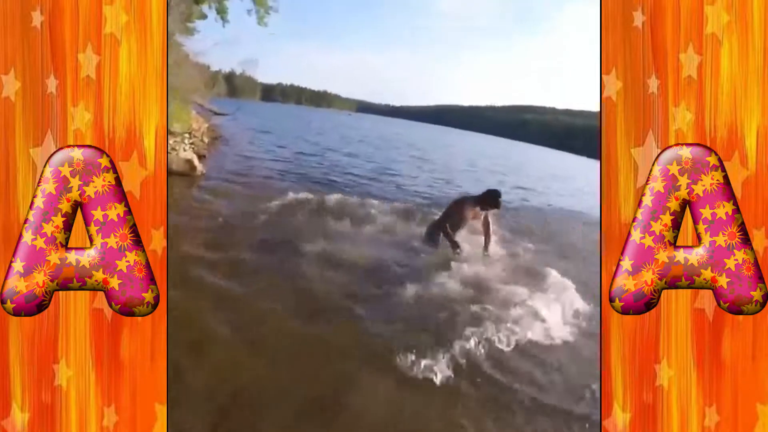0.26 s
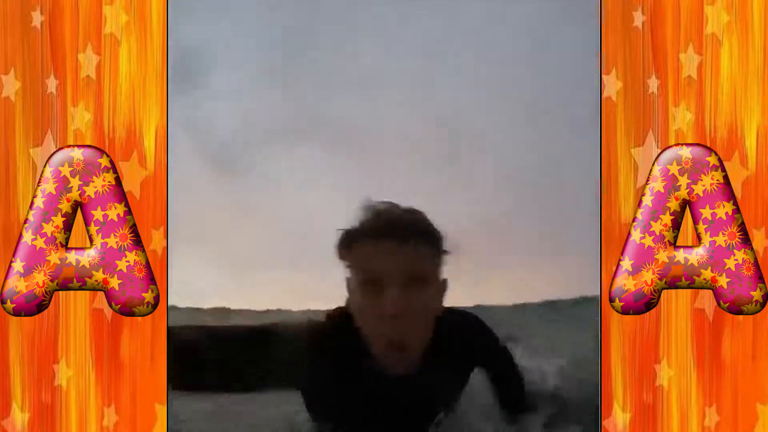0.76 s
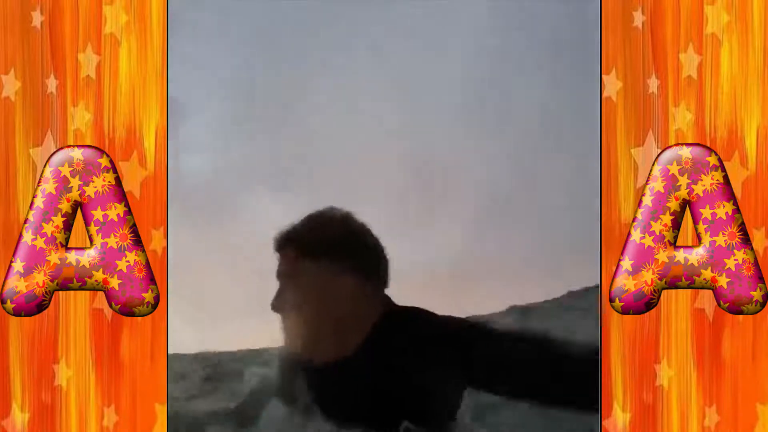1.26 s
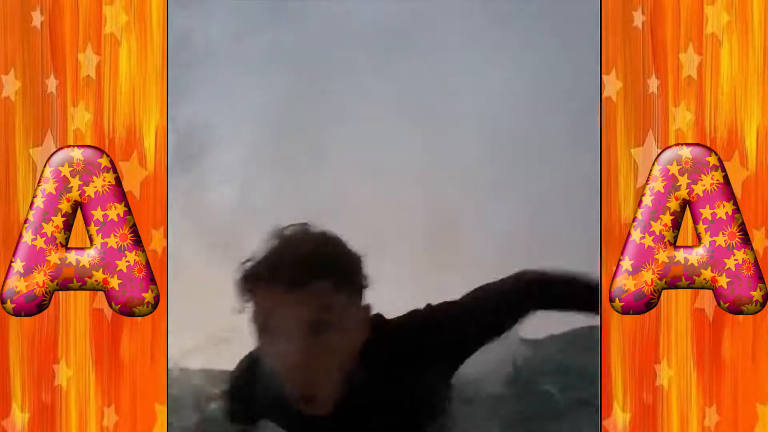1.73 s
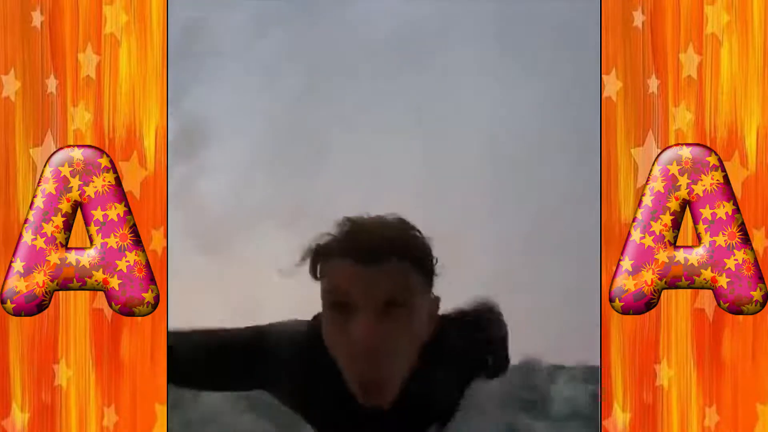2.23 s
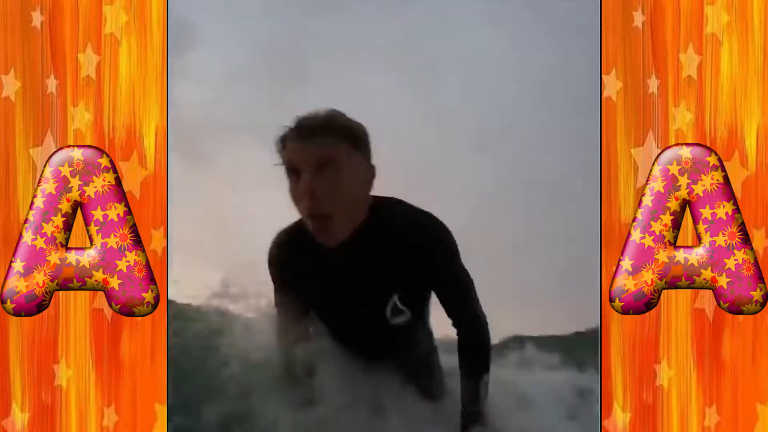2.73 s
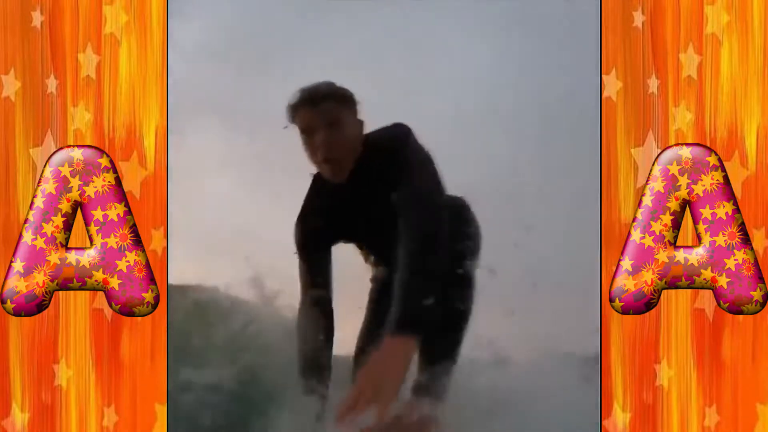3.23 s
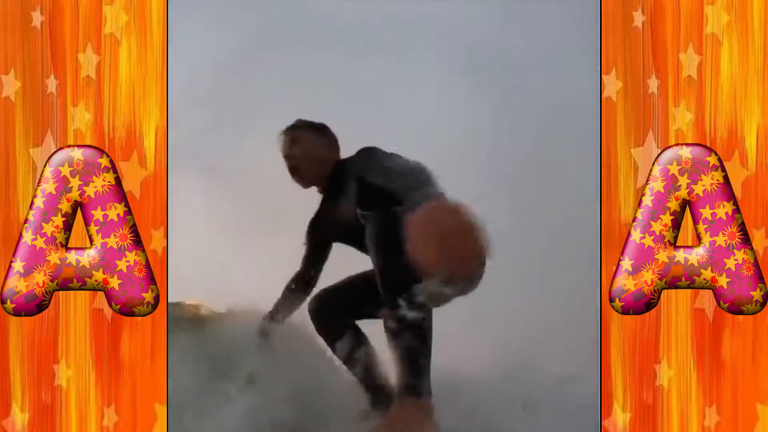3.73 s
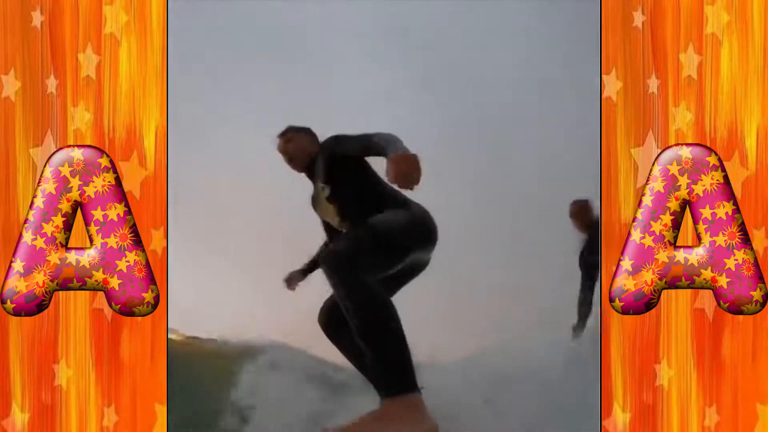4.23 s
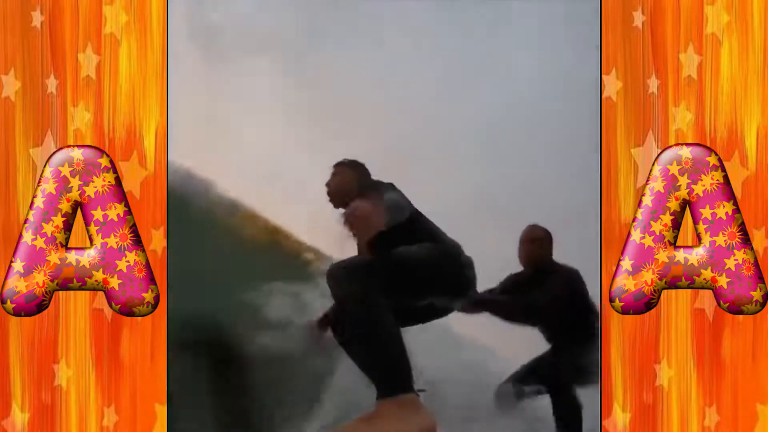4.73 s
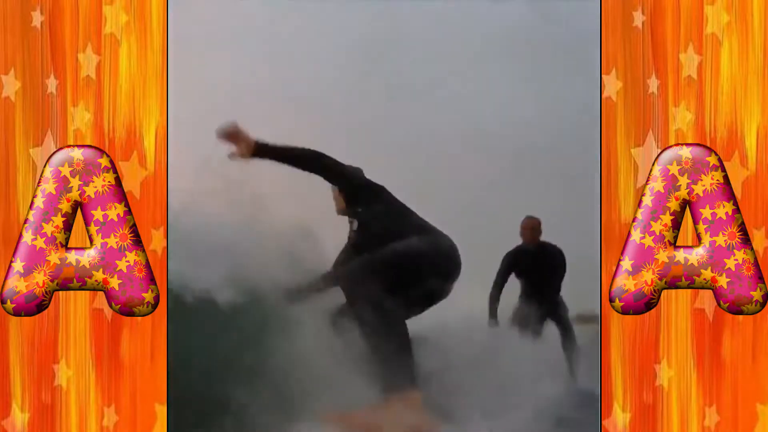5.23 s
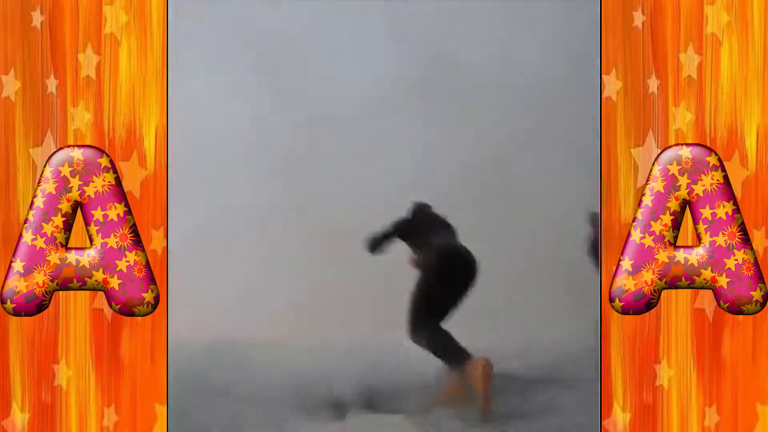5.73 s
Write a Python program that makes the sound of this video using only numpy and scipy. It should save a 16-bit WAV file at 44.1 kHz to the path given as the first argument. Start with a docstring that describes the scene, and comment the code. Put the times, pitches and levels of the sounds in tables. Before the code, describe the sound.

From 0 to about 0.45 s, a person splashes in a lake: thin bright spray hiss, light churning, low wind puffs and three soft hollow plops at 0.1, 0.2 and 0.27 s. It falls nearly silent until 0.55 s, when a surfboard's sealed camera housing takes over, close and muffled. Until 2.5 s, water rushes over it in uneven gusts, with gurgles, a hard knocking cluster near 0.9 s, sharp ticks around 1.3 s and a strong wash at 1.7 s, over low board ringing. At 2.62 s a very loud click and thump land; then deep, irregular rumbling surges and dull slaps dominate, with water thin and nearly gone around 3.4 s. Another sharp tick comes at 3.09 s. From 4 to 5 s low board hum throbs under faint streaming. After 5 s splashy washes and gurgles return, rumble continues, and bright drops click near 5.83-5.92 s before the end.

```python
"""By a lake under a light wind there is a short splash; after a brief near-silence, the scene moves to a surfboard.
The lake is filtered noise with wind puffs, splashing, spray hiss and a few hollow plops.
On the board, water and wind shake a sealed housing: noise swings as a deep surge and rings board and mount.
Streaming water is noise with droplets, coloured by the housing's resonances; trapped air gurgles in it.
Short single sounds are the board's slaps, knocks of thrown water and bright ticks of drops."""
import sys
import numpy as np
from scipy import signal
from scipy.fft import rfft, irfft
from scipy.io import wavfile
from scipy.ndimage import uniform_filter1d

SR = 44100
rng = np.random.default_rng(int(sys.argv[2]) if len(sys.argv) > 2 else 0)


def generate_wav(sig):
    """Save sig (samples, or channels by samples) to the path in sys.argv[1] as 16-bit PCM at SR."""
    pcm = np.round(np.clip(np.atleast_2d(sig).T, -1, 1) * 32767).astype(np.int16)
    wavfile.write(sys.argv[1], SR, pcm)


N = 262836   # length in samples, about 6 s


def amp(db):
    """Turn decibels into a gain."""
    return 10 ** (np.asarray(db) / 20)


def unit(x):
    """Scale to an rms (average strength) of 1."""
    return x / np.sqrt(np.mean(x ** 2) + 1e-20)


def levels(rows):
    """Draw one gain curve per level column of a table, practically silent before its first row."""
    s, *columns = np.transpose(rows)
    t = np.arange(N) / SR
    return [amp(np.interp(t, s, column, left=-150)) for column in columns]


def flutter(rate_hz):
    """Slow random wavering with rms 1: noise smoothed twice by the same low-pass."""
    r = np.exp(-2 * np.pi * rate_hz / SR)
    noise = rng.standard_normal(N + SR)
    smooth = signal.lfilter([1], [1, -2 * r, r * r], noise)
    return unit(smooth[SR:])   # the first second lets the filter settle


def resonate(x, hz, width_hz):
    """One resonance, like a struck wall; its gain is about 1 at the peak."""
    r = np.exp(-np.pi * width_hz / SR)
    feed = (1 - r * r) / 2 * np.array([1, 0, -1])
    return signal.lfilter(feed, [1, -2 * r * np.cos(2 * np.pi * hz / SR), r * r], x)


def band(x, low_hz, high_hz, order):
    """Keep only the sound between two frequencies."""
    return signal.sosfilt(signal.butter(order, [low_hz, high_hz], "band", fs=SR, output="sos"), x)


def body(x, modes, patchy_db, per_s=0, rap_db=0, count=1):
    """A body rings in several modes; each one's drive wavers on its own, and stray droplets rap single modes."""
    out = 0
    for k, (hz, width_hz, level_db) in enumerate(modes):
        strengths = amp(rap_db + 1.6 * rng.standard_normal(N))
        raps = strengths * (rng.random(N) < per_s / SR)
        # a soft contact excites little beside its mode
        ring = x + 3 * resonate(raps + 1e-18, hz, 2 * width_hz)
        ring = ring * amp(level_db + patchy_db * flutter(37))
        for _ in range(count):
            ring = resonate(ring, hz, width_hz)
        out = out + (-1) ** k * ring   # neighbours have opposite sign
    return out


def add(out, s, peak_db, sound):
    """Place a sound at a time in seconds with a given peak."""
    i = round(s * SR)
    scaled = amp(peak_db) * sound / np.abs(sound).max()
    out[i:i + len(sound)] += scaled[:N - i]


def churn(per_s, spread_db, share):
    """Turbulent water: noise mixed with uneven droplet impacts, which hold a share of the power."""
    extra_db = spread_db * np.minimum(rng.exponential(1, N), 5)
    sizes = amp(extra_db) * rng.choice([-1, 1], N)
    drops = unit(sizes * (rng.random(N) < per_s / SR))
    share = np.clip(share, 0, 1)
    return np.sqrt(share) * drops + np.sqrt(1 - share) * rng.standard_normal(N)


def steady(x, span_s, firmness):
    """Noise swells and fades by chance; a forced motion swings more evenly, so partly level it out."""
    size = round(span_s * SR)
    power = uniform_filter1d(unit(x) ** 2, size=size)
    power = uniform_filter1d(power, size=size)
    return unit(x / (power + 0.067) ** (firmness / 2))


def gusts(steady_rows, events, rises, falls):
    """Gain per layer: events climb, hold and die away at rates in dB per s; powers add to the steady level."""
    t, out = np.arange(0, N + 32, 32) / SR, []   # a coarse clock, one step per 32 samples
    s, hold, *peaks_db = np.transpose(events)[:, :, None]
    started = np.arange(N) >= steady_rows[0][0] * SR
    for base, peak_db, rise, fall in zip(levels(steady_rows), peaks_db, rises, falls):
        below_db = rise * np.maximum(s - t, 0) + fall * np.maximum(t - s - np.abs(hold), 0)
        power = np.sum(amp(peak_db - below_db) ** 2, axis=0)
        power = np.interp(np.arange(N) / SR, t, power)
        out.append(np.sqrt(base ** 2 + power) * started)
    return out


# The lake over time. Each row: time in seconds, wind on the microphone in dB, splashing in dB, spray hiss in dB.
LAKE_LEVELS = [(0.0, -12, -36.5, -29.5), (0.126, -41, -38, -32.5), (0.284, -48, -37, -33.5),
               (0.296, -49, -38.5, -30), (0.318, -25, -38.5, -31.5), (0.412, -33, -37.5, -33.5),
               (0.432, -23.5, -55, -48), (0.466, -32, -48.5, -43), (0.478, -56, -64.5, -73),
               (0.548, -66, -58.5, -80)]
# Tone colour of the splashing water. Each row: frequency in Hz, relative strength in dB per Hz.
SPLASH_COLOUR = [(88, -53), (150, -14), (245, -13), (302, -9.5), (354, -14.5), (610, -7), (822, -17),
                 (962, -13), (1130, -15.5), (3910, -21), (5270, -14.5), (6070, -18.5), (9080, -8.5),
                 (9910, 11), (12900, -83)]
# Hollow plops. Each row: start in seconds, peak in dB, ring in Hz, time to fade by 60 dB in seconds.
LAKE_PLOPS = [(0.095, -30, 317, 0.053), (0.19, -19.5, 324, 0.1), (0.268, -15.5, 298, 0.094)]


def lake():
    """Wind puffs, splashing, spray hiss with the microphone's peak near 5 kHz, and cavities that plop."""
    wind, splashing, spray = levels(LAKE_LEVELS)
    hz = np.arange(N // 2 + 1) * SR / N + 1   # 1 Hz up, so the logarithm exists
    colour_hz, colour_db = np.transpose(SPLASH_COLOUR)
    colour = amp(np.interp(np.log(hz), np.log(colour_hz), colour_db))
    water = irfft(rfft(churn(1500, 2.4, share=0.2)) * colour, N)
    low = band(water, 91, 2660, order=4)
    high = band(water, 2740, 14000, order=4)
    high = high + 6.4 * resonate(high, 5370, 330) + 2.6 * resonate(high, 6470, 270)
    puffs = band(rng.standard_normal(N), 13.6, 35.5, order=2)
    out = wind * steady(puffs, 0.026, firmness=0.18)
    out += splashing * unit(low) + spray * unit(high)
    out *= np.arange(N) < LAKE_LEVELS[-1][0] * SR   # the lake ends with its last row
    t = np.arange(SR // 10) / SR
    for s, peak_db, ring_hz, t60 in LAKE_PLOPS:
        # the surface closes with a dull push, the cavity rings on
        push = -1.6 * np.exp(-(t / 0.0022 - 1) ** 2)
        ring = np.sin(2 * np.pi * ring_hz * t) * amp(-60 * t / t60)
        add(out, s, peak_db, push + ring)
    return out


# Resonances of the board. Each row: frequency in Hz, width in Hz, relative strength in dB.
BOARD_MODES = [(64.2, 19, -3), (81.7, 20.6, 1.5), (106.6, 19, -14.5)]
# Resonances of the mount. Each row: frequency in Hz, width in Hz, relative strength in dB.
MOUNT_MODES = [(168, 130, -5), (220, 40, 1), (269.3, 15.1, 4.5)]
# Steady motion of the board under the jolts.
# Each row: time in seconds, surge in dB before its 0.62 trim, board ring in dB, mount ring in dB.
GLIDE_LEVELS = [(0.55, -36, -38, -43), (0.7, -24, -30, -40.5), (1.0, -27, -30, -36.5), (1.6, -20, -30, -46),
                (2.0, -26.5, -25, -39), (2.25, -28, -30.5, -52), (2.45, -11, -28, -46),
                (2.68, -15, -35.5, -53), (3.4, -19, -31, -55), (3.47, -18.5, -47, -56),
                (3.6, -27, -31, -63.5), (4.15, -23, -25.5, -46), (4.45, -25, -15.5, -35.5),
                (4.85, -16.5, -26, -39.5), (5.3, -19.5, -21, -34), (5.96, -17.5, -36, -37.5)]
# Chop jolts the board.
# Each row: start of the hold in seconds, hold in seconds, surge in dB before its 0.62 trim,
# board ring in dB, mount ring in dB.
CHOP_JOLTS = [(0.552, 0.038, -38, -43, -35), (0.74, 0.089, -38, -38, -33.5),
              (0.813, 0.067, -20, -13, -30.5), (1.146, 0.013, -30, -44, -32.5),
              (1.237, 0.07, -40, -22.5, -27.5), (1.402, 0.017, -36, -19.5, -58),
              (1.475, 0.018, -29, -19, -34.5), (1.565, 0.023, -26, -43, -30),
              (1.686, 0.021, -13.5, -17, -20.5), (1.745, 0.088, -41, -11, -31.5),
              (1.98, 0.016, -33, -39, -36), (2.097, 0.069, -33, -25, -36), (2.271, 0.01, -18.5, -49, -36),
              (2.342, 0.029, -13.5, -19.5, -37), (2.384, 0.15, -25, -26.5, -26.5),
              (2.525, 0.015, -12, -13, -32), (2.617, 0.0038, -18, -29, -25.5),
              (2.737, 0.044, -13.5, -30, -48), (2.802, 0.02, -4.5, -36, -31.5),
              (2.92, 0.012, -22, -40, -36.5), (2.955, 0.0063, -13.5, -34, -42),
              (3.036, 0.018, -18, -37, -36), (3.086, 0.022, -8, -18, -30.5),
              (3.197, 0.019, -34, -19.5, -47), (3.345, 0.008, -18, -28, -53),
              (3.521, 0.0051, -13, -13.5, -45), (3.587, 0.043, -12, -19, -39.5),
              (3.66, 0.068, -19, -17, -36), (3.731, 0.018, -8, -31, -42), (3.805, 0.08, -13, -19, -35),
              (3.873, 0.075, -17.5, -16, -37), (4.015, 0.013, -19.5, -21, -33.5),
              (4.219, 0.082, -40, -17, -34.5), (4.336, 0.077, -12.5, -18, -37),
              (4.55, 0.12, -44, -19.5, -47), (4.752, 0.031, -25, -36, -34.5), (4.906, 0.014, -15, -31, -48),
              (4.967, 0.0046, -8.5, -17, -28), (5.112, 0.007, -29.5, -18.5, -26.5),
              (5.201, 0.015, -8, -36, -44), (5.31, 0.12, -19, -27, -35.5), (5.463, 0.04, -26, -16.5, -25),
              (5.515, 0.015, -20, -14.5, -37.5), (5.564, 0.014, -7, -34, -44),
              (5.675, 0.052, -11, -16.5, -31), (5.739, 0.023, -8.5, -34, -45),
              (5.817, 0.0075, -20, -10, -19), (5.892, 0.031, -21, -15, -34)]
BOARD_WANDER, WANDER_HZ = .09, 5.006   # the water's load shifts the board's pitch: rms share, speed


def rumble():
    """Water and wind push the board about and set board and mount ringing."""
    surge, board, mount = gusts(GLIDE_LEVELS, CHOP_JOLTS,
                                rises=(356.5, 399.5, 415.5), falls=(553.5, 257, 419))
    deep = steady(band(rng.standard_normal(N), 23.0, 43.3, order=2), 0.039, firmness=0.29)
    ring = body(rng.standard_normal(N), BOARD_MODES, patchy_db=0.5)
    ring = band(ring, 45.2, 103.0, order=3)
    # reading the ring faster or slower bends its pitch; the drift is removed so that both ends stay put
    wander = np.cumsum(BOARD_WANDER * flutter(WANDER_HZ))
    position = np.arange(N) + wander - np.linspace(0, wander[-1], N)
    ring = steady(np.interp(position, np.arange(N), ring), 0.032, firmness=0.69)
    buzz = body(churn(300, 0.52, share=0.44), MOUNT_MODES, patchy_db=0.0)
    buzz = steady(band(buzz, 59, 490, order=2), 0.028, firmness=0.038)
    return 0.62 * surge * deep + board * ring + mount * buzz


# The board slaps down. Each row: start in seconds, peak in dB, swing in Hz, relative mount thud in dB.
BOARD_SLAPS = [(0.551, -19.5, 188, -24), (2.617, -10, 45, 8.5), (2.799, -8.5, 40.2, -16),
               (3.084, -8.5, 57, -10), (3.101, -14.5, 70.4, 0), (3.322, -8, 44.7, -2.5),
               (3.861, -7, 93, -9), (4.406, -11, 73.6, -6), (5.67, -14, 39.8, 14.5)]


def slaps():
    """The board gives one dull swing and back, and the mount a short thud."""
    out, t = np.zeros(N), np.arange(SR // 10) / SR
    for s, peak_db, hz, thud_db in BOARD_SLAPS:
        swing = -np.sin(2 * np.pi * hz * t) * (t * hz) * np.exp(-2.5 * t * hz)
        thud = np.sin(2 * np.pi * 185 * t) * (t / 0.016) * np.exp(-t / 0.0057)
        add(out, s, peak_db, swing / np.abs(swing).max() + amp(thud_db) * thud)
    return out


# Broad walls of the housing. Each row: frequency in Hz, width in Hz, relative strength in dB.
WALL_MODES = [(303, 140, -5.5), (512.5, 117, -0.5), (843, 175, -1)]
# The housing's own ringing. Each row: frequency in Hz, width in Hz, relative strength in dB.
HOUSING_MODES = [(1196, 352, -2), (1903, 394, -1), (2316, 365, -4.5), (2753, 1010, -15.5)]
# The microphone port. Each row: frequency in Hz, width in Hz, relative strength in dB.
PORT_MODES = [(3536, 460, 4), (3720, 1500, -4), (5600, 630, -16.5), (6010, 780, -16.5), (7850, 690, -27)]
# Water streaming past between the washes. Each row: time in seconds, rush in dB, wallow in dB, spray in dB.
STREAM_LEVELS = [(0.55, -43, -47.5, -50.5), (0.75, -38, -47, -48), (1.0, -42.5, -45.5, -50),
                 (1.4, -36, -41.5, -50), (1.9, -38.5, -43, -51.5), (2.3, -39.5, -42.5, -50.5),
                 (2.625, -38, -48, -40.5), (2.635, -47, -49, -57.5), (3.0, -48.5, -51.5, -57.5),
                 (3.3, -52, -54.5, -62), (3.39, -61, -68, -70.5), (3.47, -49, -56, -59.5),
                 (3.53, -42.5, -43.5, -53.5), (3.9, -45, -47.5, -54), (4.47, -43, -43, -53.5),
                 (4.9, -43.5, -42.5, -51.5), (5.2, -37.5, -44, -46), (5.64, -44, -42, -51),
                 (5.96, -38.5, -37, -50.5)]
# Water washes over the housing.
# Each row: start of the hold in seconds, hold in seconds, rush in dB, wallow in dB, spray in dB.
WATER_WASHES = [(0.55, .01, -45, -53, -48), (0.709, 0.04, -35.5, -58, -47),
                (0.804, 0.038, -29.5, -27.5, -41.5), (0.849, 0.081, -27.5, -34.5, -38),
                (0.965, 0.0061, -38, -38, -46), (1.102, 0.011, -35, -69, -36),
                (1.147, 0.005, -26.5, -37, -40.5), (1.203, 0.012, -37.5, -54, -63),
                (1.3, 0.024, -28.5, -40, -38), (1.362, 0.011, -37, -48, -42), (1.444, 0.012, -34, -41, -43),
                (1.478, 0.082, -31, -31, -43), (1.617, 0.0057, -37, -47, -58),
                (1.68, 0.03, -22, -24, -39.5), (1.723, 0.042, -28.5, -30, -40),
                (1.806, 0.013, -33.5, -30.5, -52), (1.969, 0.022, -34.5, -36, -57),
                (2.116, 0.1, -37.5, -59.5, -49.5), (2.316, 0.088, -35.5, -33.5, -52),
                (2.386, 0.13, -34.5, -31.5, -70), (2.49, 0.13, -32, -32, -55),
                (2.796, 0.023, -43, -48, -50), (2.907, 0.0076, -44, -42.5, -71),
                (3.02, 0.085, -44, -43.5, -59), (3.168, 0.0053, -41.5, -41, -52.5),
                (3.311, 0.016, -44, -51, -53), (3.498, 0.0064, -41.5, -37.5, -71),
                (4.201, 0.11, -43.5, -45, -59.5), (4.716, 0.066, -40, -39.5, -67),
                (4.942, 0.042, -39.5, -36, -49), (5.088, 0.03, -31.5, -39.5, -43),
                (5.226, 0.072, -32.5, -35, -42), (5.319, 0.046, -37, -37.5, -41),
                (5.363, 0.15, -39.5, -37.5, -53), (5.55, 0.014, -38.5, -44, -62),
                (5.678, 0.0081, -38.5, -34, -55)]


def rush():
    """Water streams over the housing in gusts; one drive excites walls, housing and port."""
    level, wallow, spray = gusts(STREAM_LEVELS, WATER_WASHES,
                                 rises=(755.5, 656.5, 555), falls=(701.5, 704.5, 597))
    waver = amp(1.5 * flutter(17) + 0.86 * flutter(70))
    drive = waver * churn(1200, 3.4, share=0.25)
    thrown = np.clip(level / amp(-35.0), 0, 1.5)   # the harder the wash, the more droplets fly
    low = body(drive, WALL_MODES, patchy_db=3.0, per_s=30 * thrown, rap_db=15)
    low = band(low, 330, 875, order=2)
    dull = body(drive, HOUSING_MODES, patchy_db=1.0, per_s=120 * thrown, rap_db=13.0, count=2)
    bright = body(drive, PORT_MODES, patchy_db=1.5, per_s=80 * thrown, rap_db=12.0, count=2)
    low, dull, bright = (steady(x, 0.038, firmness=0.041) for x in (low, dull, bright))
    return wallow * low + level * dull + spray * bright


# Trapped air gurgles along the housing. Each row: start in seconds, peak in dB, starting pitch in Hz.
AIR_GURGLES = [(0.746, -29.5, 755), (0.798, -21, 340), (1.2, -21.5, 828), (1.434, -24.5, 1305),
               (5.299, -28.5, 890), (5.527, -27.5, 1230), (5.677, -22, 1233)]
GURGLE_CYCLES, GURGLE_RISE = 4.1, 0.0019   # decay time in cycles; phase stretch per cycle, raising the pitch


def gurgles():
    """A bubble swells, rings a few cycles and rises a little in pitch."""
    out, t = np.zeros(N), np.arange(SR // 10) / SR
    for s, peak_db, hz in AIR_GURGLES:
        cycles = t * hz
        swell = cycles * np.exp(-cycles / GURGLE_CYCLES)
        tone = np.sin(2 * np.pi * cycles * (1 + GURGLE_RISE * cycles))
        add(out, s, peak_db, swell * tone)
    return out


# Thrown water knocks the housing. Each row: start in seconds, peak in dB, loudest mode in Hz.
WATER_KNOCKS = [(0.551, -32, 1270), (0.586, -25.5, 2340), (0.604, -27.5, 846), (0.687, -33, 1150),
                (0.711, -21.5, 1870), (0.813, -27, 1260), (0.847, -19, 1950), (0.859, -15, 1920),
                (0.879, -18, 1276), (0.897, -9, 1980), (0.928, -20.5, 1260), (0.977, -24, 1850),
                (1.142, -21, 1820), (1.376, -18.5, 1840), (1.488, -20, 1920), (1.609, -19.5, 1820),
                (1.677, -16, 1900), (1.693, -16, 837), (1.73, -18, 950), (1.804, -18, 1870),
                (1.905, -26, 1920), (2.307, -29, 1204), (2.615, -16, 2200), (5.092, -22, 2310),
                (5.115, -29, 1930), (5.221, -32, 2040), (5.453, -26, 1260), (5.67, -27, 1930)]


def knocks():
    """A soft blow of a few milliseconds swells and rings mostly one housing mode."""
    out, t = np.zeros(N), np.arange(SR // 20) / SR
    for s, peak_db, hz in WATER_KNOCKS:
        blow = rng.standard_normal(len(t)) * np.exp(-(t / 0.0015 - 1.5) ** 2)
        rest = sum(amp(db) * resonate(blow, mode_hz, w) for mode_hz, w, db in HOUSING_MODES)
        # a few cycles up, more down, a faint tail
        cycles = t * hz
        swell = cycles ** 0.66 * (np.exp(-cycles / 3.1) + 0.076 * np.exp(-cycles / 5.7))
        ring = swell / swell.max() * np.sin(2 * np.pi * cycles)
        add(out, s, peak_db, ring + 0.12 * rest)
    return out


# Drops on the microphone port.
# Each row: start in seconds, peak in dB, brightness in Hz, time for the burst to fade by 60 dB in seconds,
# relative housing ring in dB.
DROP_TICKS = [(0.755, -23.5, 3400, 0.017, -5), (1.034, -29, 4110, 0.019, 2), (1.098, -15, 3870, 0.014, -1),
              (1.289, -7, 5270, 0.011, 5), (1.297, -10.5, 3540, 0.023, 4), (1.313, -26, 4120, 0.016, -6),
              (1.408, -22.5, 3600, 0.015, -9), (2.6248, -2, 5440, 0.0096, 12), (2.86, -46, 5500, 0.008, -3),
              (2.8697, -19, 5350, 0.012, 10), (3.05, -14, 3640, 0.02, 6.5),
              (3.0893, -6.5, 5700, 0.0076, 9.5), (3.124, -32, 4750, 0.013, -11),
              (3.135, -37, 4780, 0.02, -11), (3.167, -29.5, 4100, 0.014, 8), (3.3293, -31, 4230, 0.07, 19),
              (3.826, -36.5, 3970, 0.018, -3), (3.985, -27.5, 3500, 0.02, 1),
              (4.417, -28.5, 5470, 0.0082, 14), (4.472, -34, 5500, 0.017, 18), (5.07, -25, 3550, 0.017, -2),
              (5.278, -27, 4000, 0.012, 11), (5.83, -20.5, 6400, 0.01, 11.5),
              (5.8429, -18.5, 5160, 0.011, 6), (5.9179, -15, 4800, 0.012, 1)]
TICK_RISE_S = .0008


def ticks():
    """A drop gives a sharp click with a short bright burst, and rings the housing."""
    out, t = np.zeros(N), np.arange(SR // 20) / SR
    for s, peak_db, hz, t60, housing_db in DROP_TICKS:
        burst = rng.standard_normal(len(t)) * amp(-60 * t / t60) * np.minimum(t / TICK_RISE_S, 1)
        burst[round(TICK_RISE_S * SR)] += 4.0   # the click
        snap = 1.8 * resonate(resonate(burst, hz, .35 * hz), hz, .35 * hz)
        snap = snap + 0.37 * resonate(burst, 4200, 630) + 1.5 * resonate(burst, 2300, 700)
        knock = sum(amp(db) * resonate(burst, mode_hz, w) for mode_hz, w, db in WALL_MODES + HOUSING_MODES)
        add(out, s, peak_db, band(snap, 680, 8100, order=3) + amp(housing_db) * knock)
    return out


def scene():
    """The lake, then the ride, whose water sounds lose a narrow band in the sealed port."""
    water = rush() + gurgles() + knocks() + ticks()
    water = water - resonate(water, 4400, 250)   # the lost band: centre and width in Hz
    return (lake() + rumble() + slaps() + water)[None]


def record(dry):
    """Round off the high peaks smoothly, then cut the top: 70 dB down from 10250 Hz on."""
    rounded = dry / (1 + (dry / .68) ** 4) ** (1 / 4)
    return signal.sosfilt(signal.cheby2(14, 70, 10250, fs=SR, output="sos"), rounded)


dry = scene()
out = record(dry)
generate_wav(out)
```